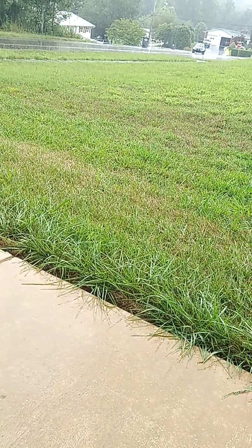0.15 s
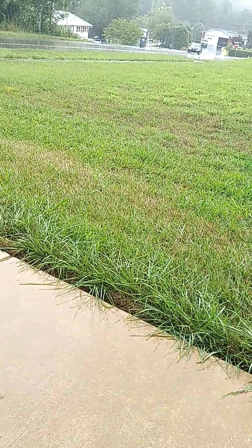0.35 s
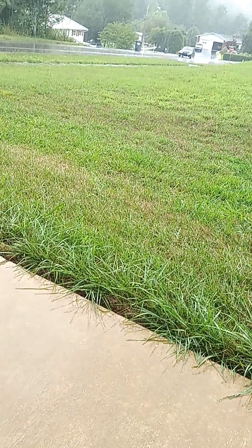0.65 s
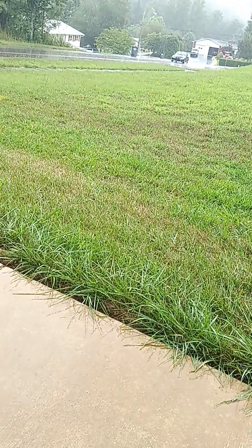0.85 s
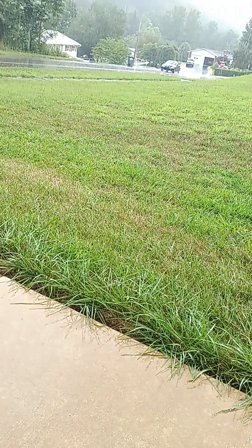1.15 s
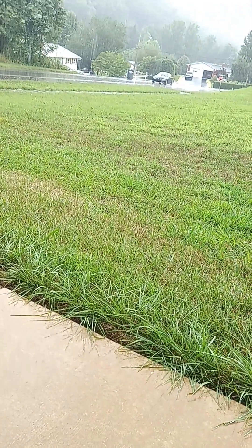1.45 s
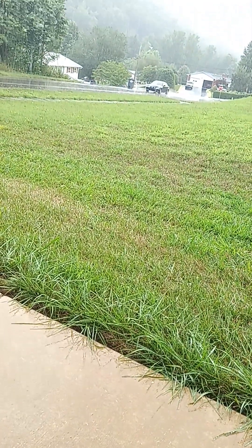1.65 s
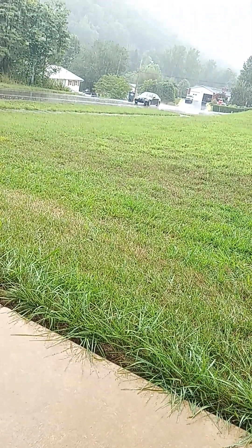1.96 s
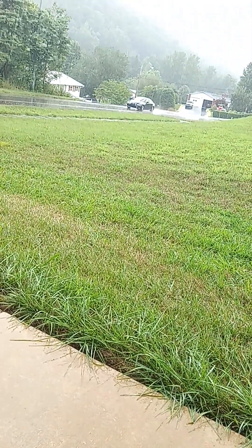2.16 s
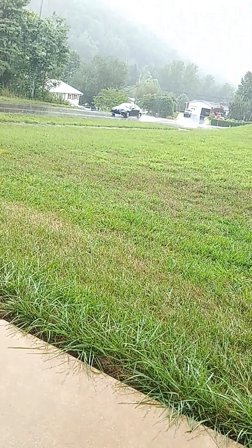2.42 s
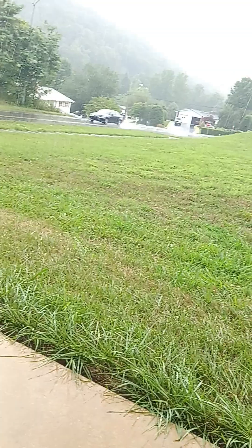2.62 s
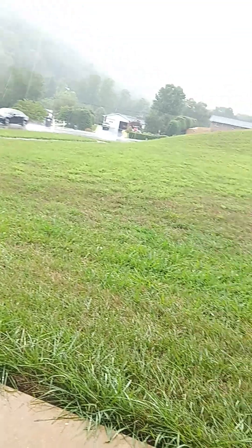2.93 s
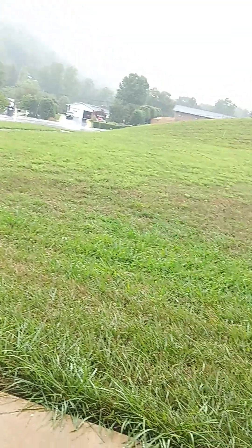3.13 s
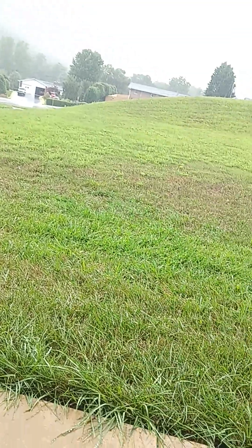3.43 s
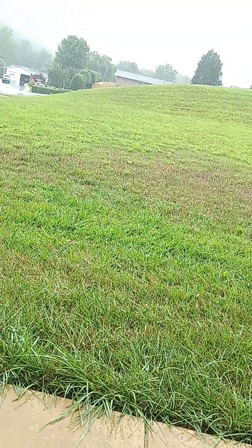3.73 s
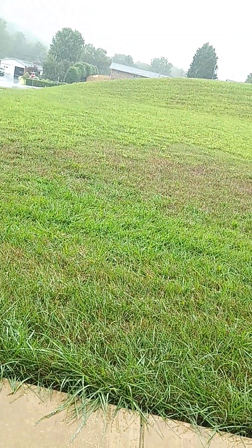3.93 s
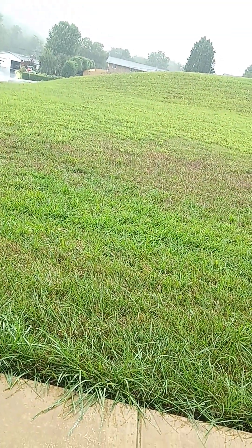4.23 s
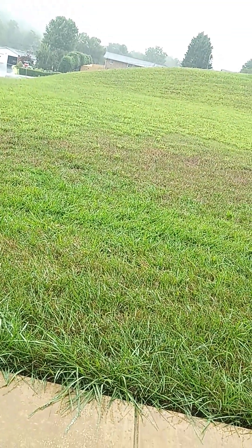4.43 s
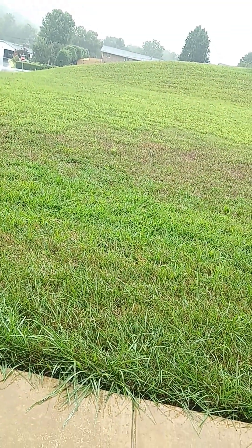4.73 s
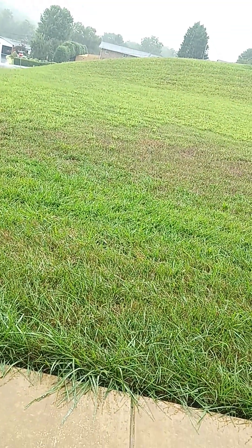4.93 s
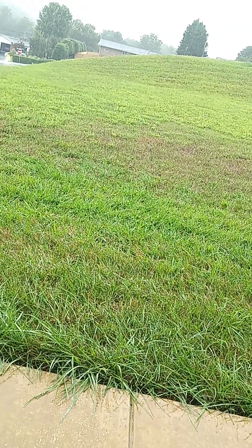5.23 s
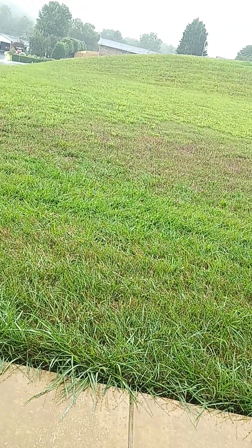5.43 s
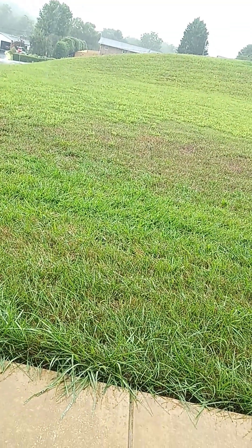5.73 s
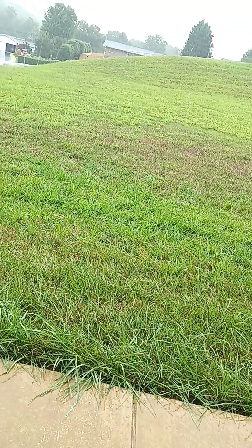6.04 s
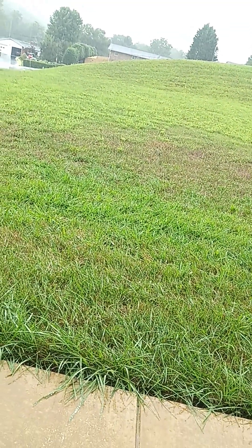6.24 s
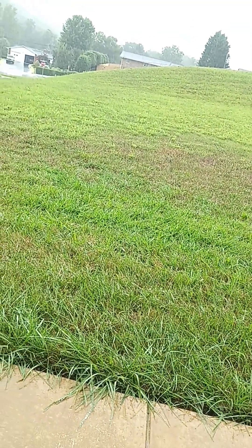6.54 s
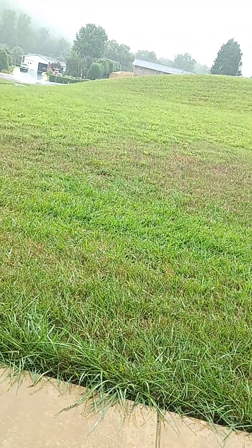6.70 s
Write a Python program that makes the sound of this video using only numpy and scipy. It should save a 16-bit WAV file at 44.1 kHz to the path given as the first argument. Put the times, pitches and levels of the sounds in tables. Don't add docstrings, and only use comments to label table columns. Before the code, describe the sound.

Constant rain falls on grass and a wet path. Distant wet tyres grow into a bright, sizzling wash over a road roar and faint engine drone, pulsing as puddles are hit. After passing, the spray is cut off by a rise and the rain remains. Sharp tiny drops click near the handheld stereo microphone, and a brief low gust buffets its left side near the start.

```python
import sys
import numpy as np
from scipy import signal
from scipy.fft import rfft, irfft, next_fast_len
from scipy.io import wavfile
from scipy.ndimage import uniform_filter1d, map_coordinates

SR = 44100
rng = np.random.default_rng(int(sys.argv[2]) if len(sys.argv) > 2 else 0)


def waveform_to_disk(signal):
    frames = np.transpose(np.atleast_2d(signal))
    scaled = np.clip(frames, -1, 1) * 32767
    samples = np.round(scaled).astype(np.int16)
    wavfile.write(sys.argv[1], SR, samples)


N = 302958
T = np.arange(N) / SR
LONG = next_fast_len(N)
HZ = np.fft.rfftfreq(LONG, 1 / SR) + 1

# frequency in Hz, strength in dB per Hz.
RAIN_COLOUR = [(25, -26), (50, -17), (80, -1.5), (170, -2.5), (400, -8.5), (800, -1.5), (1300, -4),
               (2200, -12), (4000, -16), (5500, -16.5), (8500, -11), (11000, -16), (13000, -18.5),
               (16500, -23.5)]
# time in seconds, signed peak (full scale is 1), pitch in Hz.
BUMPS = [
    (0.599, 0.048, 140),
    (0.635, 0.018, 150),
    (.678, 0.008, 121),
    (.759, -0.072, 113),
    (.798, -.026, 114),
    (.818, .02, 90),
    (.853, -0.027, 90),
    (.913, -0.011, 100),
    (.932, -0.023, 76),
]
# time in seconds, peak in dB, left minus right in dB.
TICKS = [(0.0195, -43, 2), (0.0822, -36, -0.5), (0.2994, -43, 3.5), (0.6649, -31, 6.5), (0.7114, -29, 2),
         (0.9009, -31, 4.5), (0.9298, -33, 6.0), (1.0294, -42, 8.5), (1.2094, -36, 6.0), (2.0882, -28, 6.5),
         (2.173, -29, 6.5), (5.468, -32, 5.5), (5.5294, -35, 3.0), (6.1539, -40, 3.5), (6.2213, -39, 0),
         (6.334, -36, -1.0), (6.4194, -45, 3.0), (6.7016, -34, -3)]
# time in seconds, nearness in dB, shade of the rise and bushes in dB.
CAR_PATH = [(0, -41, 12.5), (.45, -42.5, 2.5), (.7, -45, -3.5), (1.4, -46, -4.5), (1.9, -40.5, 1.5),
            (2.3, -39, -1.5), (2.7, -35.5, -0.5), (3.05, -34.5, -2), (3.4, -32, -1), (3.9, -29, 3.5),
            (4.25, -29.5, 3), (4.6, -30, 0.5), (5.07, -29.5, 2.5), (5.3, -33.5, 8), (5.68, -37.5, 20),
            (6.56, -44.5, 19), (6.87, -44.5, 27)]
# frequency in Hz, strength in dB per Hz.
SPRAY_COLOUR = [(880, -37), (1500, -13), (2110, -5.5), (2810, -5.5), (3420, -4), (4040, -5), (4770, -2.5),
                (5800, -3.5), (7630, 3), (9010, 3), (10500, -0.5), (11500, -5.5), (13000, -11),
                (16000, -14.5)]
# frequency in Hz, strength in dB per Hz.
ROAR_COLOUR = [(500, 2), (800, -4.5), (1100, 5.5), (1450, 3.5), (2000, 6.5), (2800, 1), (4000, -3),
               (6000, -6), (9000, -40), (12000, -80)]
# frequency in Hz, strength in dB per Hz.
RUMBLE_COLOUR = [(15, -45), (25, -16), (53, -10.5), (87, 2), (170, -7.5), (252, 1.5), (310, 1), (487, -9),
                 (763, -7), (900, -18), (1170, -16), (1980, -120)]
# time in seconds, splash in dB, length in seconds.
PUDDLES = [(0.73, 2.5, 0.037), (1.197, 0, 0.078), (1.61, 1.5, 0.037), (1.89, 2.5, 0.075), (2.18, 2, 0.031),
           (2.26, -2, 0.062), (2.544, 3, 0.016), (2.646, -3, 0.034), (3.066, 0.5, 0.045),
           (3.23, -1.5, 0.03), (3.355, 0, 0.024), (3.67, 2, 0.079), (3.915, 2, 0.049), (4.404, 0, 0.045),
           (4.574, 2, 0.02), (4.76, 3, 0.063), (4.964, 1.5, 0.079)]
# start and end in seconds, first and last pitch in Hz, level in dB.
DRONES = [(0, 2.3, 73, 71, -54), (2.4, 4, 62, 60, -57), (2.1, 3.8, 128, 125, -55),
          (3.8, 4.3, 236, 237, -52), (4.85, 5.5, 233, 234, -51), (5.3, 6.9, 83, 81, -60),
          (4.4, 5.8, 54, 54, -63), (4.7, 5.2, 108, 110, -55), (0, 6.9, 766, 767, -61),
          (0, .5, 766, 766, -60), (6.45, 6.9, 766, 768, -56)]
# start and end in seconds, pitch in Hz, level in dB.
TREAD = [
    (1.848, 2.29, 1064, -50),
    (3.184, 3.7, 1080, -53),
    (3.597, 4.3, 1360, -51),
    (4.39, 4.907, 1494, -47.5),
    (5.5, 6, 1050, -58),
]
# time in seconds, lag in samples.
LEFT_LAG = [(0, 32.1), (.5, 32.6), (1.6, 35.7), (2, 36.4), (2.6, 36), (3.4, 34), (4, 33.1), (4.3, 33),
            (4.9, 33.5), (6.9, 33.3)]
# start and end in seconds, first and last lag in samples, gain (a plain factor).
LEFT_ECHOES = [(0, 1, 25, 25.4, .06), (1, 2.3, 25.2, 27.4, .12), (2.8, 3.9, 29.3, 32.2, .3),
               (3.9, 4.5, 32.2, 33, .2), (4.5, 5.5, 33, 31.2, .17), (1, 2.3, 19.5, 22.5, .06),
               (2.9, 3.5, 5, 5, .12), (0, 1.3, 47.6, 47, .09), (2.5, 4.3, 48, 41.6, .13),
               (2.9, 5.1, 49.5, 43, -.09), (0, 2.2, 8.8, 8.3, -.1), (3.1, 5, 38.8, 35.5, -.07)]
# start and end in seconds, first and last lag in samples, gain.
RIGHT_ECHOES = [(0, 1.2, 15.9, 17.3, .18), (1.2, 2.6, 17.5, 17, .19), (2.6, 3.6, 17, 18.3, .22),
                (0, 1.4, 26, 28.5, .11), (1.3, 2.4, 22.7, 23.5, .08), (2.7, 3.7, 28.2, 28.8, .2),
                (.9, 2.4, 20, 20.6, -.13), (2.7, 3.6, 32, 32, -.1), (4.1, 5.8, 27, 25.8, -.12),
                (4.1, 5.9, 18.2, 17.4, -.15), (4.4, 5.5, 11.8, 14, .2), (5.5, 6.9, 13, 12.3, .1),
                (0, 1.7, 46, 51.5, .08), (1.7, 3.7, 52, 55, .11), (3.9, 5.2, 39.5, 37.5, .14),
                (3.7, 4.6, 44.5, 41, -.09), (1.5, 2.4, 48.5, 48.5, -.07), (2.9, 3.5, 36, 35, .08),
                (.9, 2.4, 7.2, 7.5, .18), (4, 5.9, 8, 8.7, -.16), (4.8, 5.8, 21.8, 21, .12),
                (4.2, 5, 30.6, 29.6, .1)]
# start and end in seconds, first and last lag in samples, gain.
WALL_ECHOES = [
    [(1.5, 4.5, 133, 148, -.05), (4.6, 5.5, 155, 155.5, -.2), (5.3, 5.7, 165, 165, .15)],
    [(4.8, 5.6, 137.5, 137.5, .15), (5.3, 5.7, 155.5, 155.5, -.12)],
]
# frequency in Hz, left minus right in dB.
PORT_BALANCE = [(60, 3), (110, 6), (200, 4), (380, 0.5), (700, 4.5), (1290, 11), (2380, 8.5), (4400, 5.5),
                (8120, 5.5), (15000, 6.5)]

DEEPEST_S = 4.04
PUFF_S, PUFF_LENGTH_S, PUFF_EDGE_S, PUFF_DB = .585, .38, .04, -49
RUSH_S, RUSH_DECAY_S, RUSH_DB = .735, .09, -45.5
ECHO_FADE_S, DRONE_FADE_S = .3, .25
NEAREST_DB = -31
ROAR_LAW, RUMBLE_LAW = (-43.5, 1, 0.12), (-44, 0.45, 0.63)
SPLASH_SHARE = 0.31
RUMBLE_LEAVING_DB_S = 2
MIST_DB, MIST_RISE_DB_S, MIST_FALL_DB_S, MIST_LEAST_DB = 7, 3.5, 6.5, -17
SCATTER_DB, SCATTER_SHADE, SCATTER_LEAVING_DB_S = 1, .4, 1.0
DETOUR_S = .04
PAN_DB_PER_SAMPLE, AHEAD_LAG = 0.2, 33.6


def gain_of(db):
    return np.exp(np.asarray(db) * (np.log(10) / 20))


def along(table, log=False):
    first, *columns = np.transpose(table)
    if log:
        return [np.interp(np.log(HZ), np.log(first), column) for column in columns]
    return [np.interp(T, first, column) for column in columns]


def level(x, db):
    return x * gain_of(db) / np.std(np.atleast_2d(x).mean(axis=0))


def filtered(x, response):
    return irfft(rfft(x, LONG) * response, LONG)[..., :N]


def held(start, end, fade, t=T):
    return np.clip(np.minimum(t - start, end - t) / fade + .5, 0, 1)


def span(start, end, fade):
    return slice(max(int((start - fade) * SR), 0), int((end + fade) * SR))


def walk(rate):
    count = int(rate * N / SR)
    steps = np.repeat(rng.standard_normal(count + 2), repeats=8)
    smooth = uniform_filter1d(uniform_filter1d(steps, size=8), size=8)
    return np.interp(T * count * SR / N * 8, np.arange(len(smooth)), smooth / np.std(smooth))


def delayed(x, lag):
    return map_coordinates(x, [np.arange(N) - lag], order=3, mode="nearest")


def droplets(per_s, scatter_db, share):
    size = np.minimum(rng.exponential(size=N), 4)
    struck = rng.random(N) < per_s / SR
    hits = struck * rng.standard_normal(N) * gain_of(scatter_db * size)
    share = np.clip(share, 0, 1)
    return np.sqrt(share) * hits / np.std(hits) + np.sqrt(1 - share) * rng.standard_normal(N)


def coloured(x, spectrum, own_db, own_rate, shared_db=0.):
    shaped = rfft(x, LONG) * gain_of(along(spectrum, log=True)[0])
    lo, hi, pitch = np.log2(spectrum[0][0]), np.log2(spectrum[-1][0]), np.log2(HZ)
    out = 0
    for octave in np.arange(np.floor(lo), hi + 1.5, 1.5):
        window = np.cos(np.pi / 2 * np.clip((pitch - octave) / 1.5, -1, 1)) ** 2
        flicker_db = own_db * walk(own_rate) + shared_db * (octave - lo) / (hi - lo)
        out = out + gain_of(flicker_db) * irfft(shaped * window, LONG)[:N]
    return out


def rain():
    both, left, right = (coloured(droplets(3500, 0.73, 0.11), RAIN_COLOUR, 0.19, 12, 0.66 * walk(25))
                         for _ in range(3))
    share = 1 / (1 + (HZ / 550) ** 3)
    shared = filtered([np.roll(both, shift=44), both], np.sqrt(share))
    separate = filtered([left, right], np.sqrt(1 - share))
    return level(shared + separate, -48.2) * gain_of([[-0.7], [0.7]])


def wind():
    swings = np.zeros(N)
    for s, peak, hz in BUMPS:
        swings += peak * np.exp(-((T - s) * hz / 0.51) ** 2) * np.cos(2 * np.pi * hz * (T - s))
    flutter = filtered(rng.standard_normal(N), 1 / (1 + (HZ / 110) ** 2) / (1 + (55 / HZ) ** 4))
    flutter = level(flutter, PUFF_DB) * held(PUFF_S, PUFF_S + PUFF_LENGTH_S, PUFF_EDGE_S)
    rush = filtered(rng.standard_normal((2, N)), 1 / (1 + (HZ / 1500) ** 4) / (1 + (400 / HZ) ** 4))
    rush = level(rush, RUSH_DB) * (T > RUSH_S) * np.exp(-np.abs(T - RUSH_S) / RUSH_DECAY_S)
    return rush + np.outer([1, 0], swings + flutter)


def ticks():
    burst = filtered(rng.standard_normal((2, N)), 1 / (1 + (9500 / HZ) ** 6) / (1 + (HZ / 14000) ** 8))
    starts = np.zeros((2, N))
    for s, db, pan_db in TICKS:
        starts[:, int(s * SR)] = gain_of([db + pan_db / 2, db - pan_db / 2])
    fading = signal.lfilter([1], [1, -np.exp(-1 / (.0022 * SR))], starts)
    return level(burst, -5) * fading


def drones():
    out = np.zeros(N)
    for start, end, first_hz, last_hz, db in DRONES:
        on = span(start, end, DRONE_FADE_S)
        hz = np.interp(T[on], [start, end], [first_hz, last_hz]) + 3 * walk(12)[on]
        swell = held(start, end, DRONE_FADE_S, T[on]) * gain_of(db + 2 * walk(5.6)[on])
        out[on] += swell * np.sin(2 * np.pi * np.cumsum(hz) / SR)
    return out


def tread():
    noise = rfft(rng.standard_normal(N), LONG)
    out = np.zeros(N)
    for start, end, hz, db in TREAD:
        hum = irfft(noise * np.exp(-((HZ - hz) / 130) ** 2), LONG)[:N]
        out += held(start, end, 0.17) * level(hum, db)
    return out


def tyre_hiss(spray_db, roar_db, mist_db, puffs_db):
    spray = coloured(droplets(6000, 1.2, 0.32), SPRAY_COLOUR, 0.3, 22, puffs_db)
    coarse = filtered(spray, 1 / (1 + (HZ / 11300) ** 12))
    spray = coarse + gain_of(mist_db) * (spray - coarse)
    roar = coloured(rng.standard_normal(N), ROAR_COLOUR, 0.95, 6.3)
    return level(spray, 2.98) * gain_of(spray_db) + level(roar, 0.74) * gain_of(roar_db)


def hand(heard, echoes):
    dull = filtered(heard, 1.85 / (1 + (HZ / 9500) ** 4))
    out = heard.copy()
    for start, end, first, last, gain in echoes:
        on = span(start, end, ECHO_FADE_S)
        late = T[on] - np.interp(T[on], [start, end], [first, last]) / SR
        out[on] += gain * held(start, end, ECHO_FADE_S, T[on]) * np.interp(late, T[on], dull[on])
    return out


def car(around):
    near_db, shade_db = along(CAR_PATH)
    splash_db = sum(db * np.exp(-((T - s) / length) ** 2) for s, db, length in PUDDLES)
    spray_db = near_db - shade_db + splash_db
    roar_db, rumble_db = (db + near * (near_db - NEAREST_DB) - shade * shade_db + SPLASH_SHARE * splash_db
                          for db, near, shade in (ROAR_LAW, RUMBLE_LAW))
    mist_db = MIST_DB - np.maximum(MIST_RISE_DB_S * (DEEPEST_S - T), MIST_FALL_DB_S * (T - DEEPEST_S))
    mist_db = np.maximum(mist_db, MIST_LEAST_DB)
    leaving_s = np.clip(T - DEEPEST_S, 0, 1.5)
    puffs_db = 0.7 * walk(8) + 0.35 * walk(31) + 1.2 * walk(110)

    rumble = level(coloured(rng.standard_normal(N), RUMBLE_COLOUR, 0.98, 8.6), -4.5)
    rumble = rumble * gain_of(rumble_db + RUMBLE_LEAVING_DB_S * leaving_s) + drones()
    direct = tyre_hiss(spray_db, roar_db, mist_db, puffs_db) + tread()
    lag = along(LEFT_LAG)[0]

    wide_db = np.interp(np.log(HZ), np.log([1180, 2870, 5450, 8000]), [-6.5, -9.5, -6.5, -6])
    scattered = filtered(tyre_hiss(spray_db, roar_db, mist_db, puffs_db), gain_of(wide_db))
    scattered *= 1.0
    scatter_gain = gain_of(SCATTER_DB + SCATTER_SHADE * shade_db + SCATTER_LEAVING_DB_S * leaving_s)

    left_heard = delayed(direct, lag) + scatter_gain * np.roll(scattered, int(DETOUR_S * SR))
    right_heard = direct + scatter_gain * scattered
    left = hand(left_heard + around[0], LEFT_ECHOES + WALL_ECHOES[0]) + delayed(rumble, 1.18 * lag)
    right = hand(right_heard + around[1], RIGHT_ECHOES + WALL_ECHOES[1]) + rumble
    pan_db = PAN_DB_PER_SAMPLE * (lag - AHEAD_LAG)
    return np.array([left, right]) * gain_of(np.array([pan_db, -pan_db]) / 2)


def scene():
    balance_db = along(PORT_BALANCE, log=True)[0]
    far = filtered(car(rain()), gain_of(np.array([balance_db, -balance_db]) / 2))
    return far + ticks() + wind()


def roll_off(x):
    return signal.sosfilt(signal.butter(12, 15900, fs=SR, output="sos"), x)


def record(dry):
    mix = filtered(dry, (HZ < 15880) / np.sqrt(1 + (50 / HZ) ** 4))
    return roll_off(mix)


dry = scene()
out = record(dry)
waveform_to_disk(out)
```